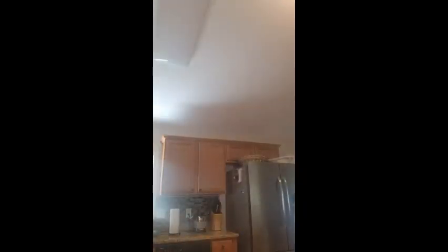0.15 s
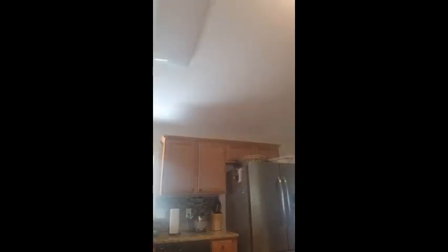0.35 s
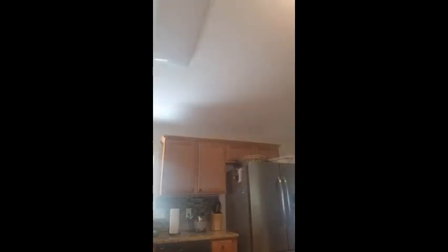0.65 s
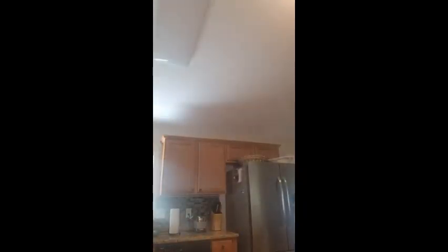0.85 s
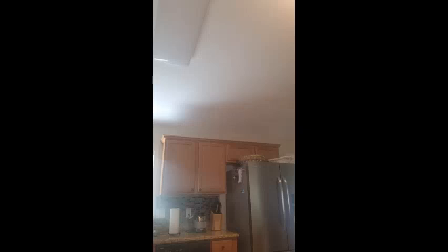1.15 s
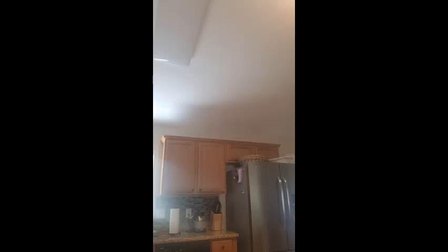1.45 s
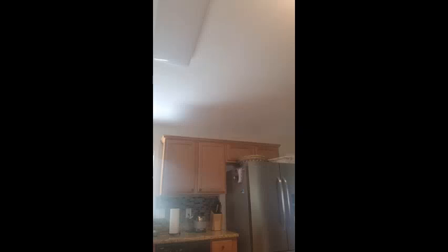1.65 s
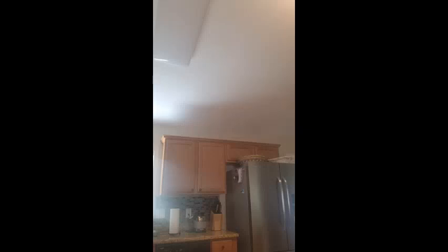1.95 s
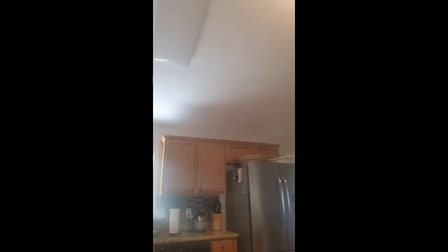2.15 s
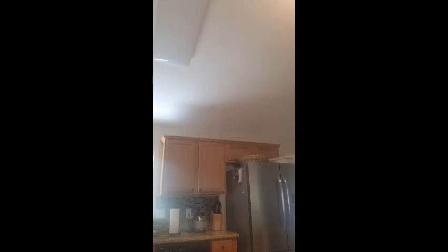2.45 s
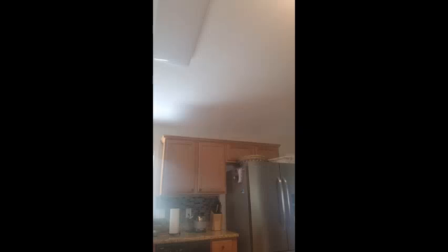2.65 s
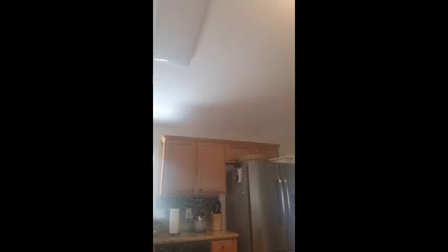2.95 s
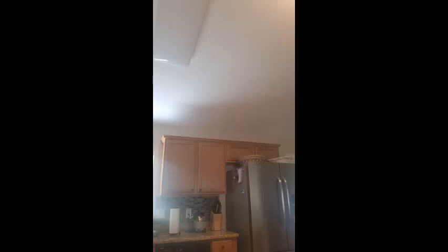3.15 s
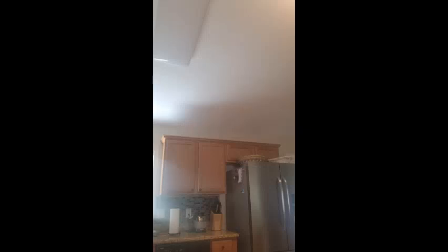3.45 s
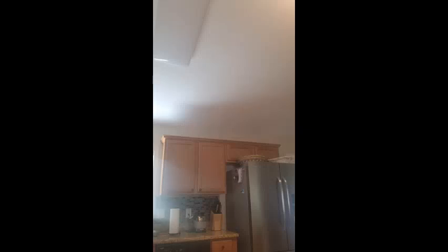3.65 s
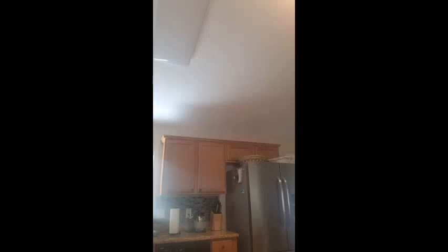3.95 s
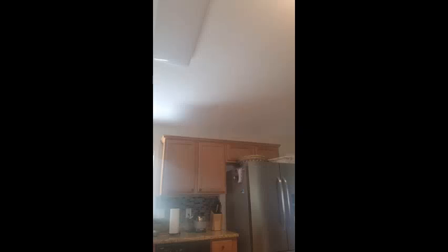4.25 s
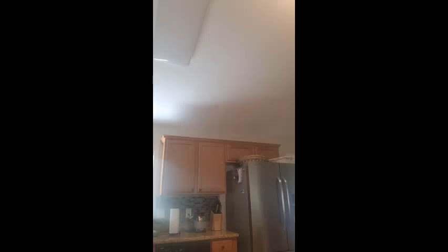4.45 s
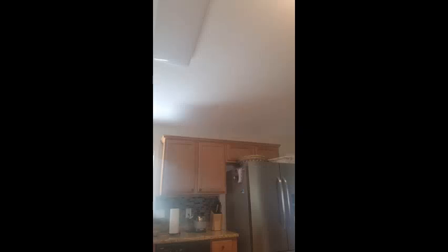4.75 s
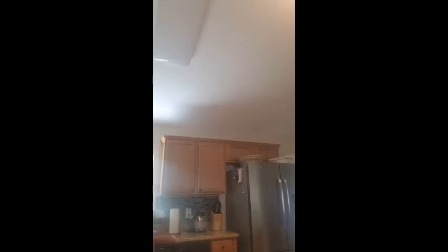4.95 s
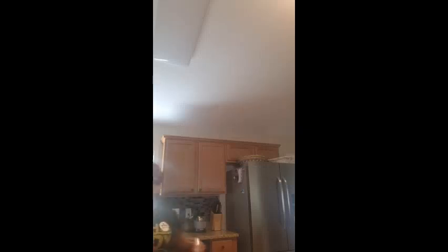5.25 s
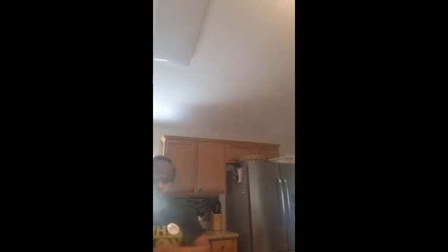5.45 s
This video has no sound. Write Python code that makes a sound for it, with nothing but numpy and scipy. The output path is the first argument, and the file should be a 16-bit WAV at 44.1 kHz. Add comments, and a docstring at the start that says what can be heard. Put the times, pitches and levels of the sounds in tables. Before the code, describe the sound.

In a hard, echoing home kitchen with a faint fridge hum, steel utensils clash in a drawer tray, jostle lightly, then crash louder as the drawer is shoved shut. After a lull come cloth swishes, a bright sharp snap, soft footfalls, a brief low judder of something dragged and a final thud. A phone a few metres away hears it in stereo.

```python
"""Rummaging in a kitchen drawer

Steel utensils clash and rattle in their tray (ringing modes and bursts of noise set off by volleys of contacts),
and the drawer is shoved shut. Then clothes swish (shaped noise), feet thud (floor resonances) and something
judders as it is dragged (a run of dull knocks). The hard kitchen rings for roughly half a second (fading
noise), over a faint fridge (narrow bands of noise). A phone a few metres away hears it in stereo."""
import sys
import numpy as np
from scipy import signal
from scipy.fft import rfft, irfft
from scipy.io import wavfile
from scipy.ndimage import uniform_filter1d

SR = 44100
rng = np.random.default_rng(int(sys.argv[2]) if len(sys.argv) > 2 else 0)


def waveform_to_disk(signal):
    """Save audio, clipped to [-1, 1], as 16-bit WAV at the path in sys.argv[1]."""
    frames = np.transpose(np.atleast_2d(signal))
    scaled = np.clip(frames, -1, 1) * 32767
    samples = np.round(scaled).astype(np.int16)
    wavfile.write(sys.argv[1], SR, samples)


N = 247665  # samples in the scene
SIZE = 32768  # samples in one short sound or room response
AGE = np.arange(SIZE) / SR  # seconds since a short sound began
TIME = np.arange(N) / SR  # seconds since the scene began


def undb(db):
    """Turn decibels into a gain."""
    return 10 ** (np.asarray(db) / 20)


def unit(x):
    """Scale to an rms of 1."""
    return x / np.sqrt(np.mean(x ** 2) + 1e-30)


def at_hz(points, hz, axis=1):
    """Read one column of a table at any frequency, with straight lines over log frequency."""
    points = np.array(points, float)
    return np.interp(np.log(hz + 1e-3), np.log(points[:, 0]), points[:, axis])


def bins(x):
    """Frequencies of the spectrum of x, in Hz."""
    return np.fft.rfftfreq(x.shape[-1], 1 / SR)


def colour(x, points):
    """Make some frequencies louder or softer, following (f/Hz, gain/dB) points."""
    return irfft(rfft(x) * undb(at_hz(points, bins(x))), x.shape[-1])


def bands(x, edges, order=4):
    """Split x into the bands between the edges, given in Hz."""
    split = []
    for pair in zip(edges, edges[1:]):
        sos = signal.butter(order, pair, "band", fs=SR, output="sos")
        split.append(signal.sosfilt(sos, x + 1e-18))
    return split


def through(x, response):
    """Send x through a response (convolution), keeping the length of x."""
    return signal.fftconvolve(np.atleast_2d(x), np.atleast_2d(response), axes=1)[:, :x.shape[-1]]


def add(out, s, x):
    """Mix x into out from time s, in seconds."""
    i = int(s * SR)
    out[:, i:i + x.shape[1]] += x[:, :N - i]


# how alike the two microphones hear the room: (f/Hz, correlation)
LIKENESS = [(60, .96), (150, .95), (300, .8), (550, .35), (1000, 0), (4000, -.15), (12000, 0)]


def diffuse(size):
    """Noise from all sides: the bass is alike in both microphones, the treble is not."""
    mid, side = rfft(rng.standard_normal((2, size)))
    alike = at_hz(LIKENESS, np.fft.rfftfreq(size, 1 / SR))
    shared = mid * np.sqrt(1 + alike)
    opposed = np.array([[1], [-1]]) * side * np.sqrt(1 - alike)
    return unit(irfft(shared + opposed, size))


# time the kitchen's echo takes to fall by 60 dB: (f/Hz, t60/s)
KITCHEN = [(80, 0.54), (260, 0.43), (700, 0.74), (1800, 0.68), (5000, 0.71), (9000, 0.49), (14000, 0.31)]


def kitchen(direct_db, early_db, early_s):
    """Room response: the straight path, a burst from nearby cabinets, and a tail that dulls as it fades."""
    centres = np.geomspace(60, 15000, 9)
    noise = rfft(diffuse(SIZE))
    tail = 0
    # each band of the noise fades at its own speed
    for hz, share in zip(centres, np.eye(len(centres))):
        band = irfft(noise * at_hz(np.c_[centres, share], bins(AGE)))
        tail = tail + band * np.exp(-np.log(1000) * AGE / at_hz(KITCHEN, hz))
    burst = undb(early_db) * np.exp(-AGE / early_s)
    response = unit(tail * (1 + burst)) / np.sqrt(SIZE)
    response[:, 0] += undb(direct_db)
    return response


def ring(modes, bass_t60_s, room):
    """Fading tones at their relative levels, each prolonged by the room; high ones die sooner."""
    out = 0
    for hz, db in modes:
        fade = np.exp(-np.log(1000) * AGE / bass_t60_s * (1 + hz / 12000))
        tone = fade * np.sin(2 * np.pi * hz * AGE)
        out = out + undb(db) * unit(through(room, tone))
    return unit(out)


def crack(decay_s):
    """The brief noisy burst of a contact."""
    return unit(rng.standard_normal(SIZE) * np.exp(-AGE / decay_s))


def voiced(x, edges, levels_db, size=1500, order=4):
    """Split a blow into bands and bring the first `size` samples of each to its level."""
    out = 0
    for band, db in zip(bands(x, edges, order), levels_db):
        out = out + band * undb(db) / np.std(band[:, :size])
    return out


def stroke(start_s, rise_s, length_s, fade_db_per_s):
    """Strength of one push: it builds up, holds to the end of its length, then dies away."""
    age = TIME - start_s
    rise = np.clip(age / max(rise_s, .002), 0, 1)
    return rise * undb(-fade_db_per_s * np.maximum(age - length_s, 0))


# colour of the still air: (f/Hz, gain/dB)
QUIET = [(15, -14), (25, -8), (52, -0.5), (75, -2.5), (274, -12.5), (378, -10), (1110, -21), (1380, -13.5),
         (2170, -35), (3260, -32.5), (3530, -21.5), (4040, -26), (9810, -26), (11200, -28.5), (15500, -30)]
QUIET_DB = -64  # rms level of the still air
# the fridge's whine: (f/Hz, width/Hz, level/dB)
FRIDGE = [(407.4, 7.5, -75.5), (1360, 47, -86.5), (3350, 210, -84)]


def background():
    """Still air as soft coloured noise, and the fridge's whines as narrow bands of noise."""
    out = undb(QUIET_DB) * unit(colour(diffuse(N), QUIET))
    for hz, width_hz, db in FRIDGE:
        edges = [hz - width_hz / 2, hz + width_hz / 2]
        out = out + undb(db) * unit(bands(diffuse(N), edges, order=2)[0])
    return out


# runners rolling: (start t/s, rise t/s, length t/s, rumble level/dB)
RUMBLE = [(0.178, 0.017, .16, -60), (3.498, 0.4, 0.52, -58.5), (4.004, 0.09, 0.16, -49)]
# scrapes whose pitch glides: (start t/s, rise t/s, length t/s, first f/Hz, last f/Hz, level/dB)
SCRAPES = [(3.991, 0.057, .11, 2450, 1838, -50), (5.158, 0.028, .13, 2440, 2570, -46),
           (5.16, .03, .1, 5540, 4710, -51.5)]
RUMBLE_FADE_DB_PER_S, SCRAPE_FADE_DB_PER_S = 134, 94.5  # once the stroke ends


def runners(half_width_hz=260):
    """Rollers rumble, and rough scrapes ring a resonance that moves as the contact slides along."""
    rumble = unit(bands(diffuse(N), [80, 240], order=3)[0])
    out = np.zeros((2, N))
    for s, rise_s, length_s, db in RUMBLE:
        out = out + rumble * undb(db) * stroke(s, rise_s, length_s, RUMBLE_FADE_DB_PER_S)
    sos = signal.butter(2, half_width_hz, fs=SR, output="sos")
    grit = signal.sosfilt(sos, rng.standard_normal((2, N)))
    for s, rise_s, length_s, first_hz, last_hz, db in SCRAPES:
        hz = np.interp(TIME, [s, s + length_s], [first_hz, last_hz])
        # multiplying by a gliding tone lifts the low noise to that pitch
        scrape = unit(grit * np.sin(2 * np.pi * np.cumsum(hz) / SR))
        out = out + scrape * undb(db) * stroke(s, rise_s, length_s, SCRAPE_FADE_DB_PER_S)
    return out


# sliding and swishing: (start t/s, rise t/s, length t/s, dull rub level/dB, rasp level/dB, hiss level/dB)
RUBS = [(0.183, 0.066, 0.12, -54, -52.5, -51), (0.768, 0.014, 0.052, -54, -54, -51.5),
        (1.658, 0.038, .2, -56.5, -62, -65), (1.922, 0.048, .22, -55, -60, -51),
        (2.887, 0.14, 0.23, -64, -61, -55), (3.211, 0.091, 0.26, -60, -80, -90),
        (3.471, 0.19, 0.32, -50, -54.5, -46), (3.816, .08, 0.11, -57, -55.5, -45),
        (3.94, 0.068, 0.13, -53, -46, -33), (4.899, 0.095, 0.14, -53.5, -54.5, -51),
        (5.112, 0.099, 0.18, -45.5, -43.5, -45.5)]
# how fast dull rub, rasp and hiss fade once the stroke ends: (fade/dB per s) for each
RUB_FADE_DB_PER_S = [101, 100.5, 128.5]
# colour of the rubbing: (f/Hz, gain/dB)
SWISH = [(180, -1.5), (300, -14), (431, -3.5), (468, -11.5), (526, -12.5), (922, -6), (1390, -17),
         (2170, -10), (3070, -8.5), (6570, -20.5), (8700, -17), (9930, -20), (15500, -17.5)]


def rubbing():
    """Runners and cloth: countless tiny slips, uneven in force, blurred by the room."""
    edges = [250, 1500, 5000, 16000]  # Hz: dull rub, rasp, hiss
    slips = rng.standard_normal(N) * undb(2.4 * np.minimum(rng.exponential(1, N), 6))
    # the grip wanders slowly, over about 500 samples
    grip = undb(4.4 * unit(uniform_filter1d(rng.standard_normal(N), size=500)))
    room = kitchen(direct_db=-10.5, early_db=-0.5, early_s=0.0033)
    texture = through(colour(slips * grip, SWISH), room)
    out = 0
    for k, (band, fade) in enumerate(zip(bands(texture, edges), RUB_FADE_DB_PER_S)):
        power = 0
        for s, rise_s, length_s, *levels_db in RUBS:
            power = power + (undb(levels_db[k]) * stroke(s, rise_s, length_s, fade)) ** 2
        out = out + unit(band) * np.sqrt(power)
    return out


# footfalls and soft bumps: (t/s, sub level/dB, thud level/dB, body level/dB, tap level/dB)
STEPS = [(0.195, -57, -81, -56.5, -59), (3.061, -77, -60, -51.5, -57), (3.092, -83, -54.5, -55, -73),
         (3.885, -47.5, -61, -53, -68), (4.362, -70, -48, -53.5, -66), (4.437, -72, -53, -59.5, -63.5),
         (4.487, -52, -60.5, -53.5, -61.5), (4.935, -52, -43.5, -46.5, -55), (4.992, -63, -43, -48, -48),
         (5.12, -30.5, -45, -46, -51), (5.537, -58, -34.5, -39, -43.5)]
# resonances of the floor: (f/Hz, relative level/dB)
FLOOR = [(55, -43), (85, 5.5), (145, -0.5), (182, 6.5), (280, -11.5), (380, 2), (470, -14), (730, -17)]


def steps(contact_s=0.00022):
    """Soft blows that reach the phone mostly through the floor, with a small tap of the sole."""
    out = np.zeros((2, N))
    edges = [35, 70, 280, 900, 15000]  # Hz: sub, thud, body, tap
    near = kitchen(direct_db=0, early_db=0, early_s=.015)
    floor = ring(FLOOR, bass_t60_s=0.21, room=near)
    tap_room = kitchen(direct_db=-14.5, early_db=-17, early_s=0.013)
    tap = unit(through(tap_room, np.exp(-AGE / contact_s)))
    for s, *levels_db in STEPS:
        add(out, s, voiced(floor + undb(2) * tap, edges, levels_db, order=3))
    return out


LEAD_S = .009  # grazes begin up to this long before the blow


def contacts(spread_s, scatter_db, graze_db, bounce_db, count=14):
    """Grazes that grow, the blow itself LEAD_S later, then weakening bounces over twice spread_s."""
    graze, bounce = rng.uniform(0, 1, count), rng.uniform(0, 2, count)
    delay = np.r_[LEAD_S, LEAD_S * graze, LEAD_S + bounce * spread_s]
    force = np.r_[undb(graze_db) * graze, undb(bounce_db) * np.exp(-bounce / 2)]
    force = force * undb(scatter_db * rng.standard_normal(len(force)))
    force = force * rng.choice([-1, 1], len(force))
    return np.bincount((delay * SR).astype(int), np.r_[1, force], SIZE)


def heap(decay_s, count=170):
    """The many modes of all the other forks and knives: random pitches fading together."""
    spikes = np.zeros(SIZE // 2 + 1)
    hz = rng.uniform(900, 15500, count)
    spikes[(hz * SIZE / SR).astype(int)] = rng.rayleigh(1, count)
    phases = np.exp(2j * np.pi * rng.random(len(spikes)))
    return unit(irfft(spikes * phases) * np.exp(-AGE / decay_s))


JOSTLE_FROM_S, JOSTLE_TO_S, JOSTLE_SCATTER_DB = 1.3, 2.4, 3
# middle loudness of a light touch: (thud level/dB, tray level/dB, steel level/dB, bright level/dB)
JOSTLE_DB = [-72.5, -58.5, -55.5, -67]


def jostles(count=7):
    """Light knocks scattered over the time the hand searches the heap, as rows like those of CLATTER."""
    chance = rng.random((count, 2))
    slots = (np.arange(count) + chance[:, 0]) / count
    times = JOSTLE_FROM_S + (JOSTLE_TO_S - JOSTLE_FROM_S) * slots
    rows = []
    for s, u in zip(times, chance[:, 1]):
        rows.append((s, *(np.array(JOSTLE_DB) + JOSTLE_SCATTER_DB * (2 * u - 1))))
    return rows


# utensils knocking: (t/s, cabinet thud level/dB, tray level/dB, steel level/dB, bright level/dB)
CLATTER = [(0.832, -62, -46.5, -72.5, -72.5), (0.858, -47, -31, -26.5, -29), (0.87, -64, -26, -64.5, -30),
           (0.925, -50.5, -67, -37, -33), (0.981, -58.5, -43, -50, -51), (1.244, -69, -49.5, -59, -64),
           (1.289, -50, -38.5, -35.5, -36), (1.304, -39, -31, -29, -35), (1.343, -42, -33, -34.5, -37.5),
           (1.585, -57.5, -41.5, -47.5, -54), (1.704, -63, -54.5, -48, -53.5),
           (1.81, -71.5, -58, -56.5, -61.5), (1.888, -71.5, -60, -52, -55.5),
           (1.966, -72.5, -55.5, -52, -64), (2.066, -62, -47, -41.5, -55.5),
           (2.085, -63.5, -48.5, -46.5, -49), (2.147, -66, -45.5, -43.5, -47),
           (2.243, -59, -37.5, -26.5, -21), (2.263, -43, -20, -28.5, -22), (2.284, -45, -41, -27.5, -27.5),
           (2.327, -49.5, -27, -33.5, -31.5), (2.516, -42.5, -28.5, -31.5, -34), (2.56, -48, -32, -46, -43),
           (2.614, -32.5, -33, -38, -36), (2.653, -74, -49, -35, -40.5), (2.73, -65, -45.5, -63, -53)]
# tones the ladle rings with: (f/Hz, relative level/dB)
LADLE = [(419.9, -39.5), (667.5, -45), (1250, -51.5), (1815, -41.5), (2498, -56), (2708, -48),
         (2945, -77.5), (3128, -54.5), (3359, -51), (3801, -78), (4226, -93.5), (4716, -49.5),
         (5136, -51.5), (5577, -59), (5792, -73.5), (5992, -52.5), (6342, -78), (6535, -54), (6745, -65),
         (7160, -55.5), (7461, -72), (7897, -86), (8274, -59), (8726, -58), (8856, -71), (9345, -52),
         (10718, -74), (11466, -61.5), (12742, -58.5), (13399, -53)]
# tones the spatula rings with: (f/Hz, relative level/dB)
SPATULA = [(371.4, -40.5), (602.9, -48), (1233, -42.5), (2110, -60), (2492, -74), (2670, -71.5),
           (3241, -56), (3854, -70), (4301, -58), (4748, -55.5), (5259, -71), (5475, -88), (5782, -94),
           (6202, -70.5), (6756, -59), (6982, -57), (7262, -57), (8134, -72), (8839, -64), (9076, -64),
           (9318, -78), (10013, -69), (10497, -86.5), (10799, -78), (11289, -82), (11488, -88.5)]
# tones the spoon rings with: (f/Hz, relative level/dB)
SPOON = [(409.1, -65), (559.9, -53.5), (651.4, -66.5), (1012, -54.5), (1448, -74), (1513, -66.5),
         (1949, -67.5), (2078, -57.5), (2121, -64), (2353, -77), (3085, -68), (3354, -69), (3865, -79.5),
         (4258, -68.5), (4608, -78), (5114, -80), (5448, -88), (5825, -82.5)]
# tones the cutlery rings with: (f/Hz, relative level/dB)
CUTLERY = [(382.2, -38.5), (624.5, -31), (1238, -35), (1432, -34), (1911, -42), (2202, -49), (2552, -44),
           (2659, -42), (3295, -53.5), (3391, -48), (4016, -48.5), (4183, -43), (4673, -59), (4899, -48.5),
           (5076, -62), (5459, -62), (5545, -47.5), (6002, -52), (6212, -57), (6648, -49.5), (6858, -68.5),
           (6971, -56), (7106, -66), (7316, -54.5), (7477, -71), (7935, -58), (8134, -56), (9060, -59.5),
           (9496, -69), (10029, -63.5)]
# tones the tongs ring with: (f/Hz, relative level/dB)
TONGS = [(382.2, -43), (1147, -34.5), (1793, -40), (2207, -46), (2460, -89), (3418, -49.5), (4215, -61),
         (4721, -59), (4920, -74), (5082, -77), (5233, -54), (5582, -58), (5954, -60), (6309, -78),
         (6530, -56), (7176, -75.5), (7321, -74), (7725, -115), (8134, -86), (8274, -66), (8893, -79),
         (9480, -83)]
# which utensil lies on top: (from t/s, its table of tones)
ON_TOP = [(0, LADLE), (1.2, SPATULA), (1.69, SPOON), (2.22, CUTLERY), (2.5, TONGS)]
# resonances of the drawer and its tray: (f/Hz, relative level/dB)
TRAY = [(380, -1), (402, 0), (526, 5.5), (576, 2), (622, 3), (690, -8.5), (845, 2.5)]
# colour of the jingle: (f/Hz, gain/dB)
CRASH = [(180, -48.5), (300, -21), (384, 4.5), (453, -14.5), (641, 1.5), (937, -9.5), (1240, -6.5),
         (1460, -4), (2000, -10), (2650, -12.5), (2980, -19), (3400, -19.5), (5660, -21.5), (9000, -24.5),
         (15500, -24)]
BOUNCE_SPREAD_S = .015  # a utensil bounces for up to twice this


def drawer():
    """Each knock bounces the utensils: the top one rings, the heap jingles, the tray clacks, the cabinet booms."""
    out = np.zeros((2, N))
    edges = [300, 900, 3500, 16000]  # Hz: tray, steel, bright
    room = kitchen(direct_db=-8.5, early_db=-7.5, early_s=0.045)
    tray = ring(TRAY, bass_t60_s=.04, room=kitchen(direct_db=-3, early_db=-3, early_s=.02))
    utensils = [(s, ring(modes, bass_t60_s=0.088, room=room)) for s, modes in ON_TOP]
    for s, thud_db, *levels_db in CLATTER + jostles():
        steel = [sound for start, sound in utensils if start <= s][-1]
        knocks = contacts(BOUNCE_SPREAD_S, scatter_db=6, graze_db=-12.5, bounce_db=-17.0)
        clang = through(undb(-5.0) * tray + steel, knocks)
        # the heap is shaken loose and keeps rattling after the blow
        jingle = crack(decay_s=0.0019) + undb(-4.0) * heap(decay_s=0.011)
        jingle = colour(jingle, CRASH) * (AGE < .5)
        rattle = contacts(BOUNCE_SPREAD_S, scatter_db=1.5, graze_db=-10, bounce_db=-4.5)
        jingle = through(through(room, jingle), rattle)
        clash = unit(clang) + undb(-2) * unit(jingle)
        add(out, s - LEAD_S, voiced(clash, edges, levels_db))
        # a one-pole lowpass at about 110 Hz turns the crack into a boom
        boom = signal.lfilter([1], [1, -np.exp(-2 * np.pi * 110 / SR)], crack(decay_s=0.006))
        add(out, s, voiced(through(room, boom), [62, 190], [thud_db]))
    return out


# sharp snaps amid the swish: (t/s, peak level/dB)
SNAPS = [(3.8357, -31), (4.0057, -16)]


def snaps():
    """Thin bright ticks close by: short bursts of high noise in the room."""
    out = np.zeros((2, N))
    room = kitchen(direct_db=-7, early_db=6.0, early_s=0.0095)
    for s, peak_db in SNAPS:
        burst = bands(crack(decay_s=0.0027), [3800, 13000], order=2)[0]
        tick = through(burst, room)
        add(out, s, tick / np.abs(tick).max() * undb(peak_db))
    return out


# resonances of the dragged thing: (f/Hz, relative level/dB)
DRAGGED = [(72, -8), (100, -3), (145, -3), (208, 11), (275, 0.5), (350, -5.5), (468, -10.5)]
# one short push
JUDDER_S, JUDDER_RISE_S, JUDDER_LENGTH_S = 5.16, 0.014, 0.093
JUDDER_DB, JUDDER_FADE_DB_PER_S = -29, 133


def judder(slip_hz=74.8, scatter_db=2, count=11):
    """A short run of uneven stick-slip jolts, each a dull knock carried straight through the floor."""
    periods = (1 + .05 * rng.standard_normal(count)) / slip_hz
    force = undb(scatter_db * rng.standard_normal(count))
    jolts = np.bincount((np.cumsum(periods) * SR).astype(int), force, SIZE)
    room = kitchen(direct_db=0, early_db=3, early_s=.015)
    knock = ring(DRAGGED, bass_t60_s=.055, room=room)
    drum = through(knock, jolts)
    # even out the loudness, so that the push alone shapes it
    drum = drum / np.sqrt(uniform_filter1d(np.mean(drum ** 2, axis=0), size=2000) + 1e-4)
    out = np.zeros((2, N))
    add(out, JUDDER_S, drum)
    push = stroke(JUDDER_S, JUDDER_RISE_S, JUDDER_LENGTH_S, JUDDER_FADE_DB_PER_S)
    return out * undb(JUDDER_DB) * push


def scene():
    """Everything in the kitchen, added together."""
    return background() + runners() + rubbing() + steps() + drawer() + snaps() + judder()


# the phone's own colour: (f/Hz, gain/dB, left minus right/dB)
PHONE = [(59.5, -8, 3.5), (226, -2, 3.5), (500, -1.5, -0.5), (1020, -4.5, 1.5), (1940, 0, 0.5),
         (4250, -2, 0), (7260, -4, -3.5), (9290, -5, 11), (9900, -7.5, 2.5), (15000, -12.5, 1.5)]
TOP_HZ = 15600  # the phone lets little through above this


def record(dry):
    """The phone colours its two microphones differently and cuts the top."""
    hz = bins(dry)
    tilt = np.array([[.5], [-.5]]) * at_hz(PHONE, hz, axis=2)
    coloured = irfft(rfft(dry) * undb(at_hz(PHONE, hz) + tilt), N)
    return signal.sosfilt(signal.ellip(10, .2, 70, TOP_HZ, fs=SR, output="sos"), coloured)


dry = scene()
out = record(dry)
waveform_to_disk(out)
```